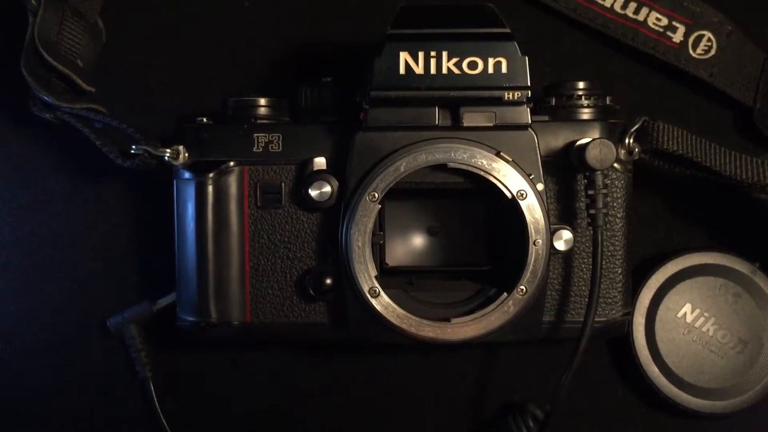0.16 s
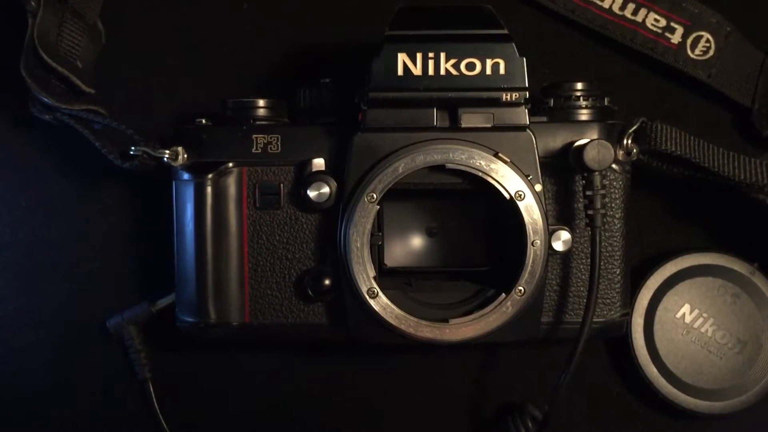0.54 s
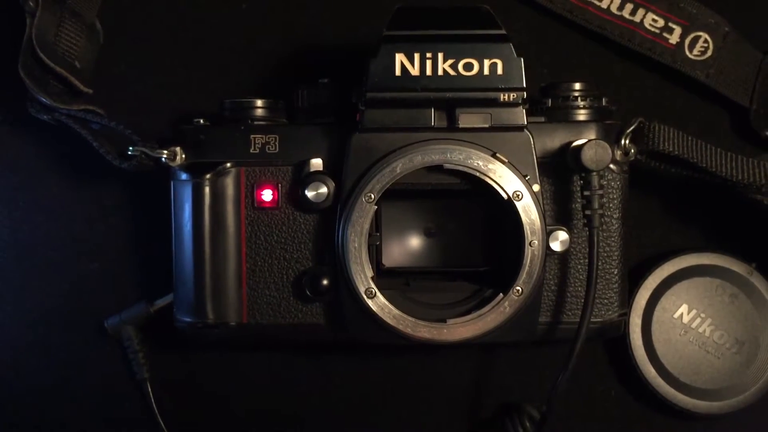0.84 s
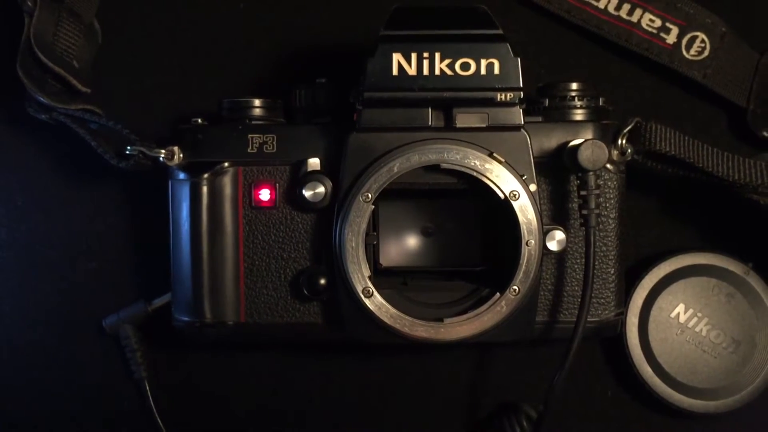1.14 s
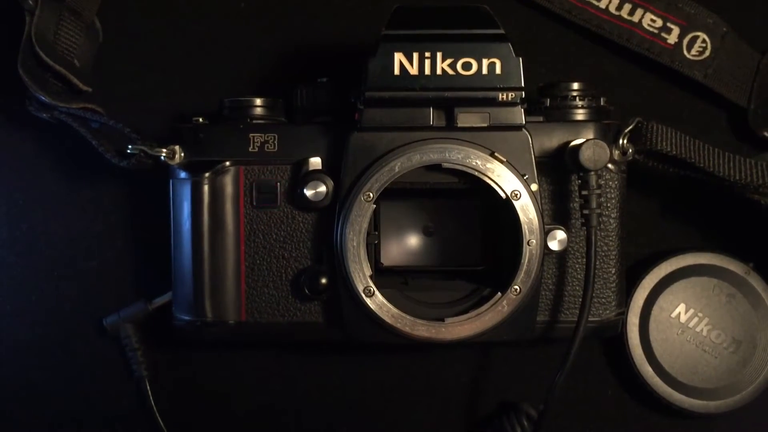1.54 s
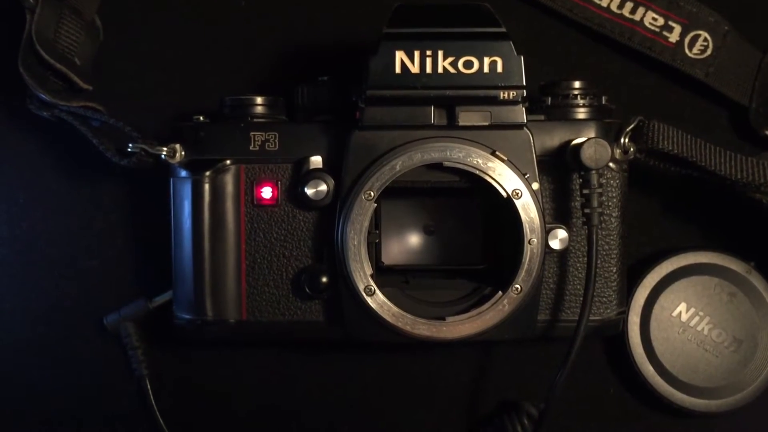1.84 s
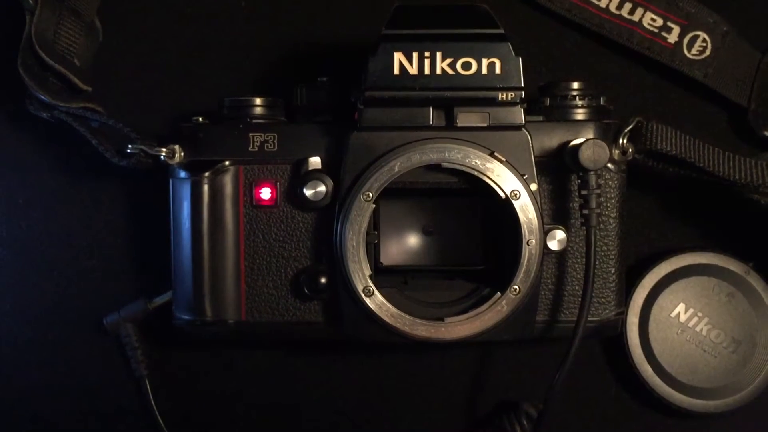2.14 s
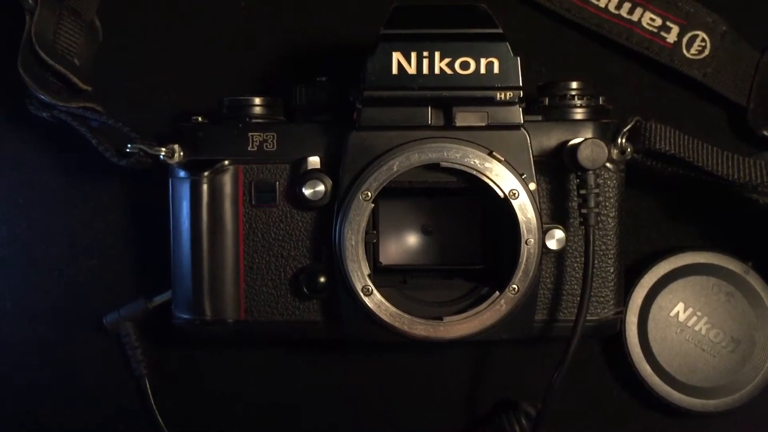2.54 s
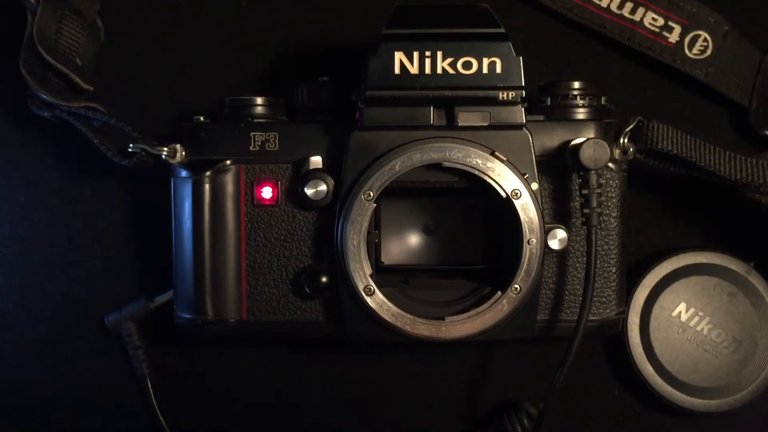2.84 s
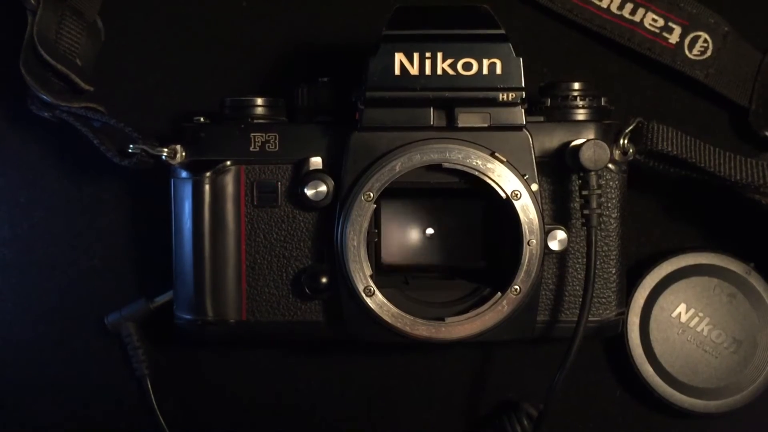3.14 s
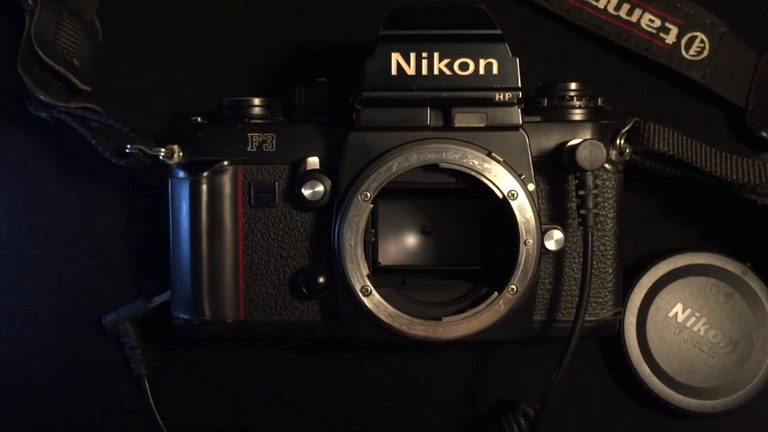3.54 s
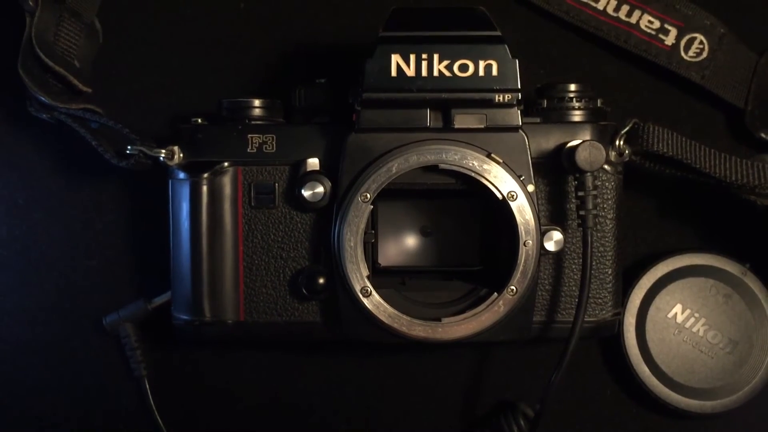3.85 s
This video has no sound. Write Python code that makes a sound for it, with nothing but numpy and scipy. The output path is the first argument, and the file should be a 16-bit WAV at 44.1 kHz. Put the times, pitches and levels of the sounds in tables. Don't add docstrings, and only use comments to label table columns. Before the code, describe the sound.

A camera shutter fires once with a loud, sharp metallic clack in a quiet, faintly humming room.

```python
import sys
import numpy as np
from scipy import signal
from scipy.io import wavfile
from scipy.ndimage import uniform_filter1d

SR = 44100
rng = np.random.default_rng(int(sys.argv[2]) if len(sys.argv) > 2 else 0)


def wav_out(sig):
    wavfile.write(sys.argv[1], SR, np.round(np.clip(np.atleast_2d(sig).T, -1, 1) * 32767).astype(np.int16))


def undo_db(level):
    steps = np.asarray(level, float) / 20
    return 10 ** steps


N = 176400


def rms_one(x):
    return x / np.sqrt(np.mean(x ** 2) + 1e-20)


def peak_one(x):
    return x / (np.abs(x).max() + 1e-20)


def ring(x, hz, t60):
    r = undo_db(-60 / (t60 * SR))
    w = 2 * np.pi * hz / SR
    return signal.lfilter([0, np.sin(w)], [1, -2 * r * np.cos(w), r * r], x + 1e-18)


def narrow_noise(hz, width_hz):
    t60 = np.log(1000) / (np.pi * width_hz * 1.5)
    once = ring(rng.standard_normal(N + SR), hz, t60)
    return rms_one(ring(once, hz, t60)[SR:])


def band(x, low_hz, high_hz):
    return signal.sosfilt(signal.butter(2, [low_hz, high_hz], "band", fs=SR, output="sos"), x)


def high_pass(x, hz, order):
    return signal.sosfilt(signal.butter(order, hz, "high", fs=SR, output="sos"), x)


CLICKS_PER_S, UNEVEN_DB, RISE_S = 16000, 2, 0.0003


def rattle(t, rattle_s):
    happens = rng.random(len(t)) < CLICKS_PER_S / SR
    strength = undo_db(-UNEVEN_DB * np.log(rng.random(len(t)) + 1e-3))
    sign = np.sign(rng.random(len(t)) - 0.5)
    return happens * strength * sign * (1 - np.exp(-t / RISE_S)) * np.exp(-t / rattle_s)


SMALL_PARTS_T60_S, SMALL_PARTS_TOP_HZ = 0.016, 10000


def small_parts(clicks, t):
    noise = 2 * rng.random(len(t)) - 1
    haze = band(noise, 1800, SMALL_PARTS_TOP_HZ) + 0.5 * noise
    return signal.fftconvolve(clicks, haze * undo_db(-60 * t / SMALL_PARTS_T60_S))[:len(t)]


# (frequency [Hz], level [dB], fade time t60 [s])
BODY_TONES = [(722, -21.5, .015), (1150, -30, 0.013), (1680, -15, .06), (2088, -16.5, .025),
              (2401, -28.5, 0.085), (2450, -25, 0.0067), (3217, -20.5, 0.038), (3600, -30, .025),
              (4365, -19.5, .025), (4714, -17, .025), (5320, -18, .04), (5680, -23.5, 0.043),
              (6520, -12.5, .025)]
MODE_SPREAD_DB = 2.5


def camera_body(clicks):
    out = 0
    for hz, db, t60 in BODY_TONES:
        out = out + undo_db(db + MODE_SPREAD_DB * rng.standard_normal()) * ring(clicks, hz, t60)
    return out


PART_CYCLES = 12
BODY_DB, SMALL_PARTS_DB, THIN_HZ = -12.5, -5, 1170


def contact(db, rattle_s, ring_hz, bright_db):
    t = np.arange(SR // 8) / SR
    clicks = rattle(t, rattle_s)
    sound = peak_one(ring(clicks, ring_hz, PART_CYCLES / ring_hz))
    sound = sound + undo_db(BODY_DB) * peak_one(camera_body(clicks))
    sound = sound + undo_db(SMALL_PARTS_DB) * peak_one(small_parts(clicks, t))
    sound = sound + undo_db(bright_db + 2.5) * peak_one(band(clicks, 3400, 15600))
    return undo_db(db) * peak_one(high_pass(sound, THIN_HZ, 3))


# (time [s], peak level [dB], rattle length [s], ring of struck part [Hz], bright share [dB])
CONTACTS_OF_RELEASE = [(3.1534, -51, 0.0074, 4000, -4), (3.169, -48, 0.0026, 2880, -6),
                       (3.1770, -14, 0.00095, 3100, -7), (3.1788, 6.5, .0007, 4350, -3.5),
                       (3.1802, 0.5, 0.00031, 1980, -5.5), (3.1883, -18.5, 0.002, 6800, -6.5),
                       (3.2043, -2.5, 0.0024, 6000, -8.5), (3.2067, 5, 0.0018, 3860, -3),
                       (3.2132, 5, .0018, 3900, -4.5), (3.2141, -8, .0006, 1710, -7),
                       (3.2191, 1, .0015, 5570, -33), (3.2265, 2, .0014, 8420, -20),
                       (3.2274, 1.5, .0009, 3000, 0), (3.2349, -11.5, 0.0022, 4473, -0.5),
                       (3.2427, 5, 0.00041, 7600, -3.5), (3.2445, 9.5, 0.0024, 4200, -12),
                       (3.2470, 4, 0.00098, 4700, -37), (3.2493, 4.5, 0.0018, 2574, -29),
                       (3.279, -0.5, 0.0017, 3800, 1.5), (3.2836, -14, .0015, 4460, -11),
                       (3.2974, -11.5, 0.0014, 3310, 4), (3.3094, -9.5, 0.0016, 4025, -2),
                       (3.3174, -15.5, 0.00035, 4060, -26), (3.329, -27, .004, 2310, -11)]


def camera_mechanism():
    out = np.zeros(N)
    for s, *settings in CONTACTS_OF_RELEASE:
        sound = contact(*settings)
        start = int(s * SR)
        out[start:start + len(sound)] += sound
    return out


# (time [s], level [dB], frequency [Hz], fade time t60 [s])
TABLE_KNOCKS = [(3.2066, -11.5, 616.6, 0.013), (3.2065, -14, 1300, 0.0094), (3.2076, -8, 2290, 0.017),
                (3.2275, -16, 680, .02), (3.2462, -9, 540, .014), (3.2451, -10, 1400, 0.02),
                (3.2453, -13, 220, 0.025), (3.244, -25.5, 110, 0.053), (3.2490, -26.5, 62, 0.08),
                (3.2100, -20.5, 934, .08), (3.2500, -23.5, 762, 0.121), (3.2520, -27.5, 1150, .12),
                (3.301, -21, 1680, 0.098), (3.301, -27, 3180, 0.12), (3.3570, -36, 701, 0.01)]


def table_knocks():
    out = np.zeros(N)
    for s, db, hz, t60 in TABLE_KNOCKS:
        click = np.zeros(N)
        click[int(s * SR)] = undo_db(db)
        out += ring(click, hz, t60)
    return out


ROOM_DB, ROOM_RISE_S, ROOM_T60_S = -14, 0.0044, 0.17
LATE_DB, LATE_T60_S = -27, 0.49
ROOM_LOW_HZ, ROOM_HIGH_HZ = 500, 15000


def room(x):
    t = np.arange(SR) / SR
    fade = undo_db(-60 * t / ROOM_T60_S) + undo_db(LATE_DB - 60 * t / LATE_T60_S)
    tail = band(rng.standard_normal(SR), ROOM_LOW_HZ, ROOM_HIGH_HZ)
    tail = tail * (1 - np.exp(-t / ROOM_RISE_S)) * fade
    return undo_db(ROOM_DB) * signal.fftconvolve(x, tail / np.sqrt(np.sum(tail ** 2)))[:N]


def steady_tone(hz):
    return np.sqrt(2) * np.sin(2 * np.pi * (hz * np.arange(N) / SR + rng.random()))


# (frequency [Hz], rms level [dB], width [Hz], share of noise [0-1])
HUM_TONES = [(59.2, -53.5, 4.1, 0.63), (98.1, -47.5, 10, 0), (199.2, -46, 8, 0.3), (117.5, -58, 9.1, 0.7),
             (140.5, -55, 24, .95)]


def mains_hum():
    out = np.zeros(N)
    for hz, db, width_hz, share in HUM_TONES:
        tone = np.sqrt(1 - share) * steady_tone(hz)
        waver = np.sqrt(share) * narrow_noise(hz, width_hz)
        out += undo_db(db) * (tone + waver)
    return out


MOTOR_HZ = 48.76
MOTOR_MULTIPLES = [15, 17, 18, 20, 28, 29, 30, 31, 32, 34, 35]
MOTOR_LEVELS = [-72.5, -79, -75, -77, -77, -77.5, -63.5, -70, -88, -84.5, -82]


def motor_whine():
    return sum(undo_db(db) * steady_tone(k * MOTOR_HZ) for k, db in zip(MOTOR_MULTIPLES, MOTOR_LEVELS))


# (frequency [Hz], level per Hz [dB])
AIR_COLOUR = [(30, -26.5), (55, -2.5), (200, -11), (500, -33.5), (1200, -26), (2200, -35), (6000, -44.5),
              (15000, -53)]
AIR_DB = -52
PATCHY_DB, PATCHY_BELOW_HZ, PATCHES_PER_S = 1.5, 2000, 6


def ventilation_and_hiss():
    out = 0
    edges = 22 * 2 ** np.arange(0, 10, 0.5)
    white = rng.standard_normal((2, N + SR))
    hz, db = np.transpose(AIR_COLOUR)
    for k, (low, high) in enumerate(zip(edges, edges[1:])):
        level_db = np.interp(np.log(low * high) / 2, np.log(hz), db)
        slow = np.interp(np.arange(N) / SR * PATCHES_PER_S, np.arange(40), rng.standard_normal(40))
        if low < PATCHY_BELOW_HZ:
            level_db = level_db + PATCHY_DB * slow
        out = out + undo_db(level_db) * band(white[k % 2], low, high)[SR:]
    return undo_db(AIR_DB) * rms_one(out)


# (frequency [Hz], width [Hz], rms level [dB])
DUCT_TONES = [(680, 100, -61.5), (1445, 110, -67.5), (290, 140, -57.5), (890, 51, -73.5)]


def air_duct():
    return sum(undo_db(db) * narrow_noise(hz, width_hz) for hz, width_hz, db in DUCT_TONES)


# (frequency [Hz], width [Hz], rms level [dB])
CLOTH_COLOUR = [(3200, 1600, -58.5), (6800, 1800, -63), (12500, 2500, -74)]
RUSTLE_S, RUSTLE_RISE_S, RUSTLE_T60_S = 2.643, 0.016, 0.16


def cloth_rustle():
    time = np.arange(N) / SR
    t = np.maximum(time - RUSTLE_S, 0)
    shape = (1 - np.exp(-t / RUSTLE_RISE_S)) * undo_db(-60 * t / RUSTLE_T60_S)
    shape *= np.interp(time, np.arange(800) / 200, undo_db(3.0 * rng.standard_normal(800)))
    return 2 * shape * sum(undo_db(db) * narrow_noise(hz, width_hz) for hz, width_hz, db in CLOTH_COLOUR)


def scene():
    clack = camera_mechanism() + table_knocks()
    background = mains_hum() + motor_whine() + ventilation_and_hiss() + air_duct() + cloth_rustle()
    return (clack + room(clack) + background)[None, :]


# (frequency [Hz], width [Hz], depth [0-1])
WEAK_TONES = [(7660, 440, 0.4), (10430, 200, 0.8)]
MIC_LOW_HZ = 45


def microphone(x):
    x = high_pass(x, MIC_LOW_HZ, 4)
    for hz, width_hz, depth in WEAK_TONES:
        x = x - depth * signal.lfilter(*signal.iirpeak(hz, hz / width_hz, fs=SR), x)
    return x


DUCK_FROM_DB, DUCK_SHARE, RECOVER_DB_PER_S = -28, 0.26, 22


def automatic_gain(x):
    level_db = 10 * np.log10(uniform_filter1d(x[0] ** 2, size=441) + 1e-12)
    wanted_db = DUCK_SHARE * np.maximum(level_db - DUCK_FROM_DB, 0)
    ramp = RECOVER_DB_PER_S * np.arange(N) / SR
    duck_db = np.maximum.accumulate(wanted_db + ramp) - ramp
    return undo_db(-uniform_filter1d(duck_db, size=221))


def roll_off(x):
    return signal.sosfilt(signal.butter(12, 16500, fs=SR, output="sos"), x)


RECORD_TOP, CUTOFF_HZ = 1.6, 16150


def record(dry):
    x = microphone(dry) * automatic_gain(dry)
    x = RECORD_TOP * np.tanh(x / RECORD_TOP)
    mix = signal.sosfilt(signal.cheby2(12, 60, CUTOFF_HZ + 500, fs=SR, output="sos"), x)
    return roll_off(mix)


dry = scene()
out = record(dry)
wav_out(out)
```